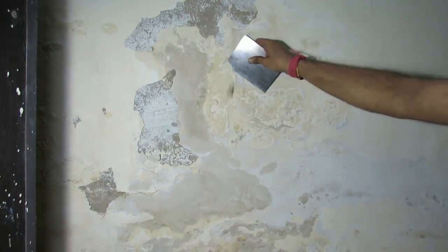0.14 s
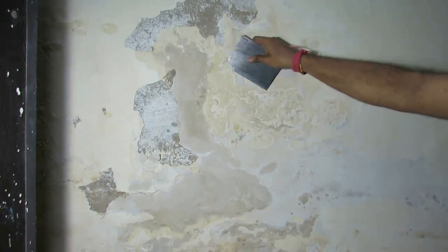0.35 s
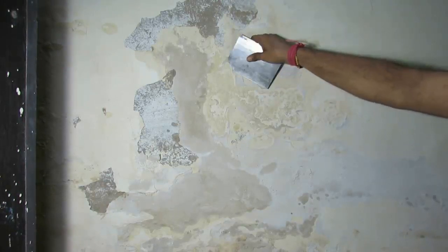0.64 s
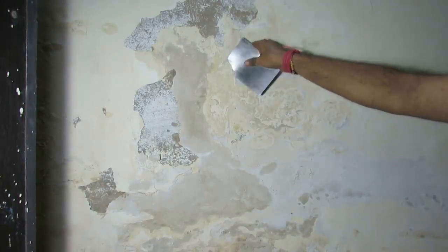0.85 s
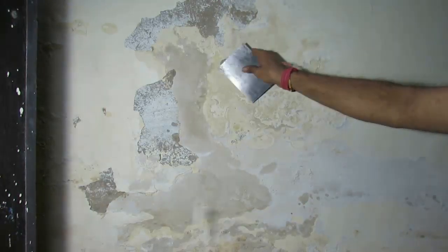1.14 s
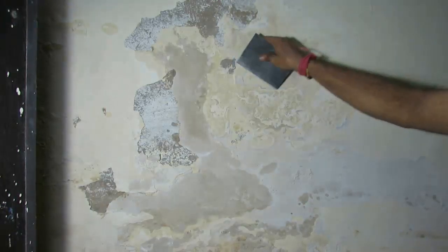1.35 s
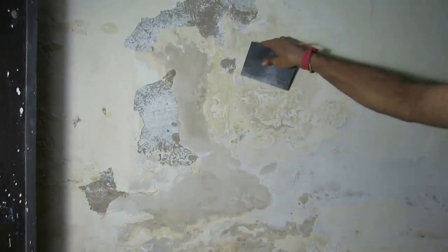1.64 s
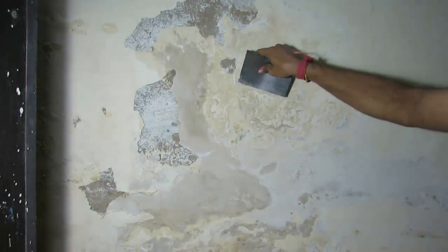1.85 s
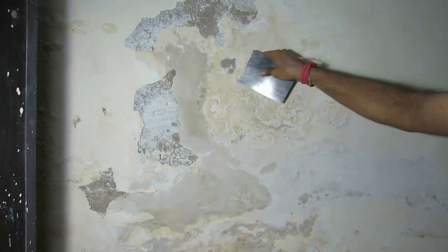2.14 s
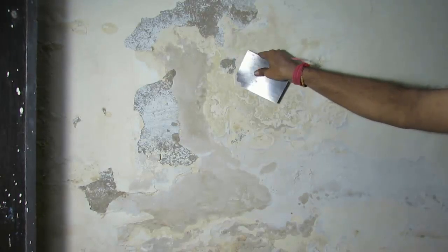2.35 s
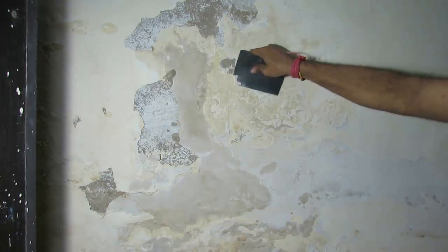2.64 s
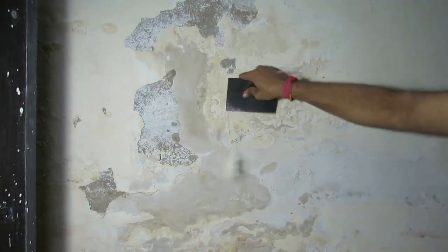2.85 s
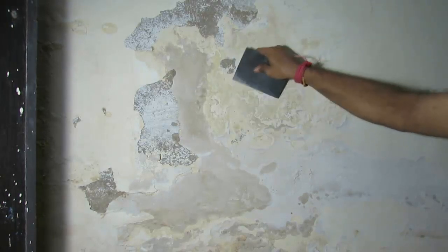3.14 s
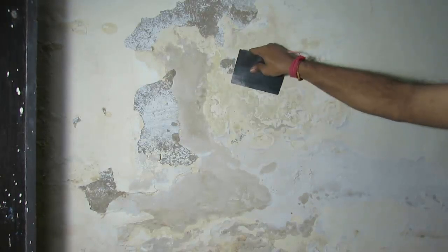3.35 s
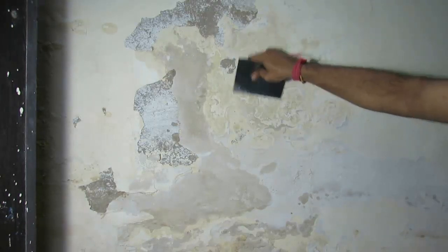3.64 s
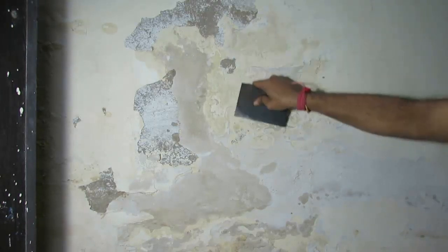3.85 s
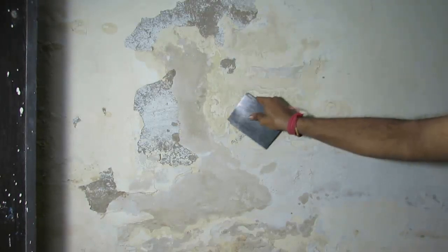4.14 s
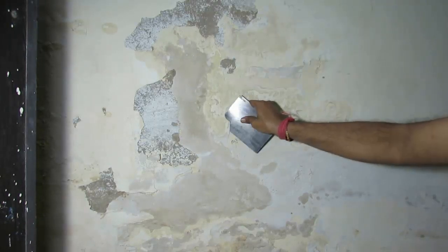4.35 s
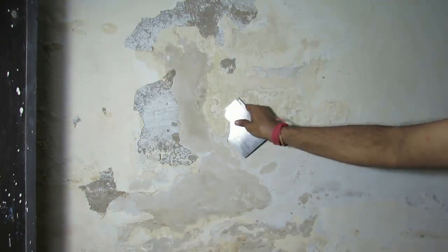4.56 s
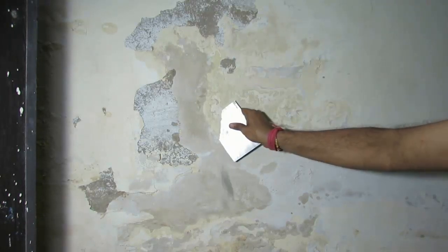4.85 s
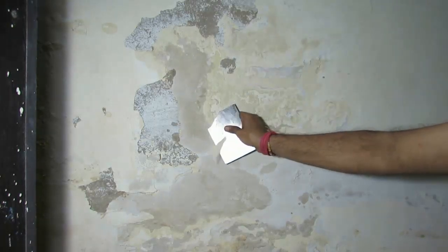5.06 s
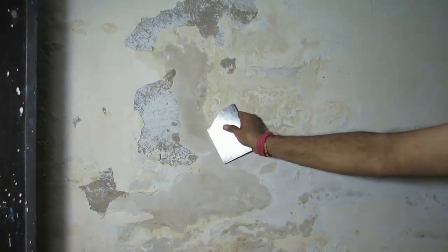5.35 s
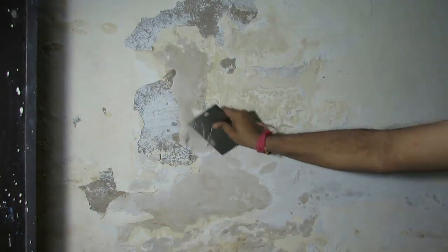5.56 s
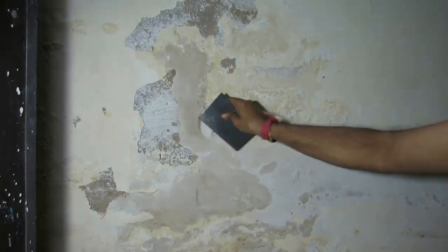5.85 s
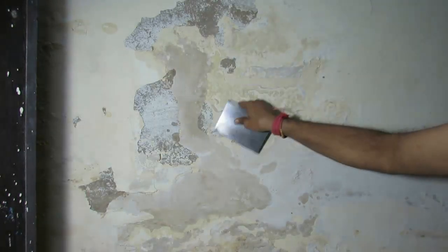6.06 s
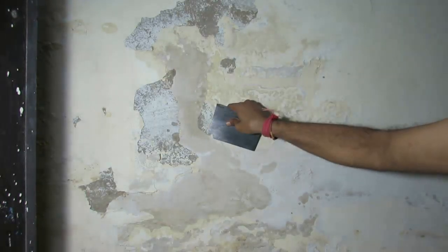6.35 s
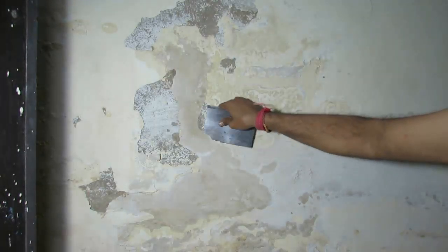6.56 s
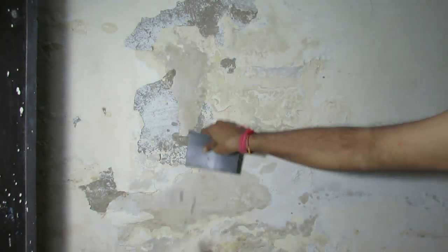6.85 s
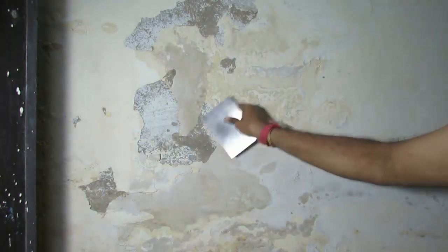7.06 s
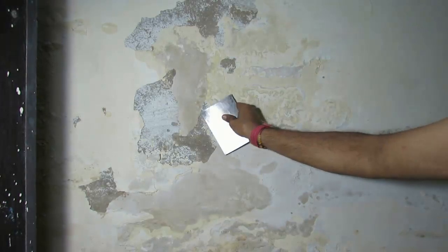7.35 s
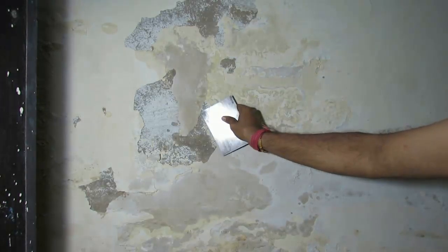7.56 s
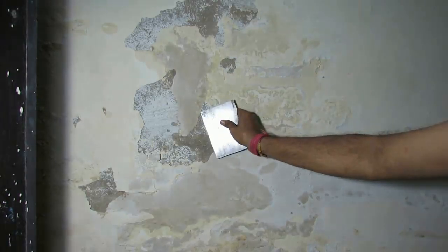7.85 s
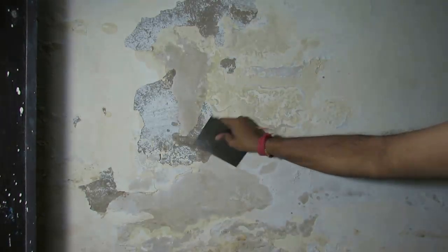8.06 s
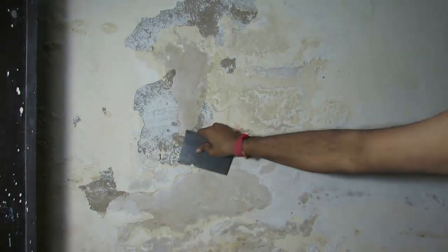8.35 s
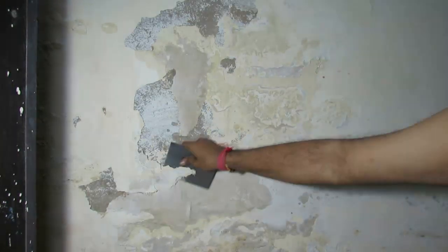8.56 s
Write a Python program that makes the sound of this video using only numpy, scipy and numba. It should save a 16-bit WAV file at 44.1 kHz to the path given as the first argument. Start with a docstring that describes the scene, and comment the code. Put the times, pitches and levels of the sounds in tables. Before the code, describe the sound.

A hand-held sheet of steel scrapes flaking plaster off a hard wall, heard very close in stereo in a small bare room with a short bright reverberation and faint airy hum. From 0 to 1.1 s sharp snaps follow quickly, with tiny squeaks and a strong crack with a dull knock at 1.1. After a brief gap, gritty rasps and snaps run from 1.4 to 3.1 s, loud near 2.05, 2.55 and 2.86; a soft low rumble swells around 3.15. A hard, squeaky crack hits at 3.45, then lighter scraping. From 4.3 to 6.6 s it is busiest: crackling breaks, crumbs, rasping skids and knocks around 4.4, 4.87 and 5.44. A heavy crack and thud lands at 6.8. Then sparse, weak scrapes and ticks until about 8 s, before a lower, coarser rasp grows from 8.2 to the end, with a final snap at 8.7.

```python
"""A small bare room with a faint hum, where a hand-held steel sheet scrapes loose plaster off a wall.
Its edge chatters over sand grains and rings the blade; it knocks on ridges and snaps flakes off.
Scrapes, cracks and thuds are bursts of tiny random breaks sent through resonances; squeaks are rough tones.
A close stereo recorder ducks and clips on the sharpest cracks."""
import sys
import numpy as np
from scipy import signal
from scipy.fft import rfft, irfft
from scipy.io import wavfile
from numba import njit

SR = 44100
rng = np.random.default_rng(int(sys.argv[2]) if len(sys.argv) > 2 else 0)


def generate_wav(sig):
    """Save sig (samples, or channels by samples) to the path in sys.argv[1] as 16-bit PCM at SR."""
    pcm = np.round(np.clip(np.atleast_2d(sig).T, -1, 1) * 32767).astype(np.int16)
    wavfile.write(sys.argv[1], SR, pcm)


N = 384552  # length in samples

# spectrum of the hand-damped blade: (multiple of its main resonance, level/dB)
BLADE_SPECTRUM = [(.1, -35.5), (0.251, -14), (.42, -12), (.66, -1), (.84, 2.5), (1, 4), (1.142, -0.5),
                  (1.35, 1.5), (1.7, 1), (2.3, -4), (4, -11), (8, -36)]
# spectrum of the wall behind the plaster: (f/Hz, level/dB)
WALL_SPECTRUM = [(60, -27), (200, -16), (420, -9.5), (620, -0.5), (950, 0.5), (1300, -6.5), (2000, -22),
                 (5000, -47)]
TOP_HZ = 15800  # the recorder keeps almost nothing above this pitch


def undb(db):
    """Turn decibels into gain."""
    return 10 ** (np.asarray(db) / 20)


def unit(x):
    """Scale a sound to an average strength (rms) of 1."""
    return x / np.sqrt(np.mean(x ** 2) + 1e-18)


def curve(rows):
    """Join (t/s, value) rows by straight lines."""
    return np.interp(np.arange(N) / SR, *np.transpose(rows))


def walk(n, rate):
    """Smooth random wander, with `rate` new random values a second joined by lines."""
    place = np.arange(n) * rate / SR
    count = int(place[-1]) + 2
    return np.interp(place, np.arange(count), rng.standard_normal(count))


def response(points, scale=1, size=512):
    """The click a body answers with, from its (f/Hz, level/dB) spectrum moved in pitch by `scale`."""
    hz, db = np.transpose(points)
    bins = np.maximum(np.arange(size // 2 + 1) * SR / size, 1)
    level_db = np.interp(np.log(bins), np.log(np.sort(hz) * scale), db)
    # folding the cepstrum makes the answer start at once, with no sound before the blow
    cepstrum = irfft(np.log(undb(level_db)))
    cepstrum[1:size // 2] *= 2
    cepstrum[size // 2 + 1:] = 0
    return unit(irfft(np.exp(rfft(cepstrum)))) / np.sqrt(size)


def colour(x, points, scale=1, size=512):
    """Pass a sound through a body with the given spectrum."""
    return signal.fftconvolve(x, response(points, scale, size))[:len(x)]


def resonate(x, hz, width):
    """Pass a sound through one resonance, `width` Hz wide, with gain 1 at its centre."""
    return signal.lfilter(*signal.iirpeak(min(hz, .45 * SR), hz / width, fs=SR), x)


def add(track, sound, s):
    """Mix a sound into a track at time s, leaving out what falls outside."""
    start = round(s * SR)
    lo, hi = max(start, 0), min(start + len(sound), N)
    if hi > lo:
        track[lo:hi] += sound[lo - start:hi - start]


def scraper(lead_s=.007):
    """Pushes with their chips, cracks with their skids, squeaks and knocks; all of it rings the steel sheet."""
    # pushes of the blade: (hardest push t/s, length/s, blade resonance f/Hz, blade level/dB, grit level/dB)
    pushes = [(.005, 0.078, 1920, -19, -28.5), (0.683, .13, 1820, -10, -13),
              (1.382, 0.077, 2180, -20.5, -23), (1.486, 0.15, 2660, -13, -15.5),
              (1.576, 0.065, 2830, -12.5, -12.5), (1.947, 0.057, 2100, -24, -31.5),
              (2.175, 0.16, 1890, -26, -27.5), (2.324, 0.068, 1940, -16, -22),
              (2.448, 0.2, 1980, -25.5, -28.5), (2.498, 0.036, 2340, -11.5, -15),
              (2.67, 0.047, 1880, -18.5, -19.5), (2.786, 0.19, 1910, -13.5, -17),
              (2.844, 0.057, 2080, -12.5, -24), (3.107, 0.27, 2310, -55, -30.5),
              (3.494, .125, 2200, -8.5, -15), (3.879, 0.12, 1800, -25.5, -35.5),
              (4.035, 0.23, 1930, -23.5, -25.5), (4.277, 0.33, 1800, -20.5, -25.5),
              (4.472, 0.19, 1662, -20.5, -24), (4.634, .057, 1740, -23.5, -26.5),
              (4.772, 0.18, 2020, -37.5, -37.5), (4.966, 0.07, 1900, -25.5, -27.5),
              (5.382, .11, 2540, -19.5, -41), (5.444, 0.074, 1920, -16.5, -20),
              (5.588, 0.076, 1250, -31.5, -26.5), (5.682, 0.11, 1660, -22.5, -19),
              (5.789, 0.15, 2070, -35, -28), (5.95, 0.12, 1900, -15.5, -24.5),
              (6.229, 0.04, 2010, -18, -25), (6.391, 0.22, 1980, -24, -24),
              (6.478, 0.082, 1900, -11.5, -23), (7.026, .12, 1760, -33, -29.5),
              (7.142, 0.15, 2500, -57, -30), (7.587, 0.038, 2160, -32.5, -54),
              (7.773, 0.037, 1840, -22, -35), (8.218, 0.27, 1826, -16.5, -24),
              (8.341, 0.33, 1757, -22.5, -26.5), (8.495, 0.097, 1490, -13.5, -22),
              (8.57, 0.19, 1605, -10, -14.5)]
    # the edge catches, plaster snaps and the freed edge skids on: (t/s, blade level/dB, flake level/dB,
    # flake resonance f/Hz, skid level against the snap/dB, fading time of the fracture force/s)
    snaps = [(.129, -15.5, -12.5, 9300, -16.5, 0.0048), (.244, -16, 0.5, 10400, -27.5, 0.0022),
             (.361, -11.5, -26, 2300, -18.5, 0.0036), (.491, -20.5, -28, 2900, -13, 0.0027),
             (.589, -1.5, -8.5, 3250, -17, 0.0035), (.708, -10, -4, 3600, -20, 0.0026),
             (.759, -5, -9.5, 3070, -31, .003), (.799, -11, -15.5, 2980, -32, .0023),
             (.895, -11.5, -9, 2900, -18, 0.0038), (0.956, 1, -2, 8350, -23.5, .0023),
             (1.077, -43, -14, 11800, -33, 0.0024), (1.107, -14, 6.5, 4970, -30.5, 0.0021),
             (1.569, -3.5, -6, 3060, -18, 0.0014), (1.768, -9.5, -9, 5700, -15, 0.0045),
             (1.984, -8.5, -8.5, 6640, -5.5, 0.0074), (2.051, 1, 4.5, 6450, -21.5, 0.0021),
             (2.31, -21, -11.5, 10100, -25, 0.0011), (2.555, -3, 0, 7100, -14.5, .008),
             (2.765, -8.5, -7, 8200, -23, .0023), (2.858, -14, 4, 7100, -37, 0.0017),
             (2.902, -34, -1.5, 10470, -45, 0.0011), (2.994, -18, -13, 3040, -10.5, 0.0028),
             (3.128, -37, -17, 4960, -31, 0.0013), (3.439, 2, 3.5, 2860, -23, 0.0012),
             (3.762, -15, -40, 3135, -20, 0.0035), (4.018, -16, -8.5, 5550, -21, .0018),
             (4.291, -4, -10.5, 3190, -40, 0.0025), (4.417, 2, -5.5, 4060, -31, 0.0022),
             (4.517, 1, -3, 8550, -23.5, 0.0019), (4.838, -2.5, -4, 3470, -31, .0017),
             (4.867, -9, 4, 7090, -22, 0.0025), (5.061, -44, -25, 12000, -22, .0015),
             (5.118, -36, -25.5, 9600, -25, .0015), (5.179, -15, 5, 6900, -28, 0.004),
             (5.33, -2, -2, 3100, -14.5, .003), (5.441, -14, -4.5, 8400, -30, 0.0028),
             (5.606, -32, -19, 6500, -32, .0012), (5.691, -26, -5.5, 3710, -22, 0.0024),
             (5.722, -28, -3, 8350, -30, 0.0017), (5.784, -33, -9.5, 8500, -20, .0035),
             (5.841, -22, -2, 9400, -26, 0.0036), (6.007, -12, -1.5, 3500, -15, 0.012),
             (6.147, -28, -21.5, 2900, -31, 0.0022), (6.223, -19, -10, 10000, -26, 0.0022),
             (6.236, -4.5, -1.5, 4020, -16.5, 0.0029), (6.315, -25, -1, 7000, -18, 0.0035),
             (6.365, -12, -16, 3260, -33, 0.0019), (6.448, -11.5, -6.5, 3000, -22, 0.0039),
             (6.589, -10, -14, 4700, -6.5, 0.014), (6.799, -8.5, 2.5, 3400, -23.5, 0.0044),
             (7.08, -23, -13, 5800, -16, 0.0016), (7.193, -48, -21.5, 8350, -25, 0.0037),
             (7.459, -27, -22, 6270, -17.5, 0.0024), (7.922, -16.5, -21.5, 3940, -14, 0.013),
             (8.468, -12.5, -32, 3226, -4, 0.0048), (8.704, -17, -8.5, 7950, -23, 0.0034)]
    # the edge sticks and gives a brief squeak: (t of its peak/s, f/Hz, level/dB, fall time/s)
    sticks = [(0.562, 1750, -0.5, .0018), (.689, 1750, -3, 0.0029), (1.108, 5080, -6, 0.0039),
              (1.382, 2450, -14, 0.0092), (1.484, 3800, -12, .009), (2.003, 2540, -12, 0.0066),
              (3.476, 2600, -3.5, 0.0066), (5.647, 1650, -16, 0.0029), (5.661, 1200, -17, 0.0022),
              (5.684, 3700, -15, 0.0027), (5.947, 1800, -9, 0.0068), (6.466, 1700, -4, 0.0019),
              (6.985, 1650, -21.5, .003), (8.194, 1800, -11, 0.0034)]
    # the blade knocks into the wall: (t/s, level/dB, pitch of the thud f/Hz)
    blows = [(1.106, -20, 395), (2.556, -20, 597), (2.857, -18, 600), (4.417, -15, 760), (4.838, -25, 705),
             (4.868, -11, 620), (5.439, -14, 701), (6.802, -8, 543)]
    # narrow rings of the steel sheet: (f/Hz, width/Hz, level/dB)
    steel_rings = [(658, 5.2, -13.5), (1035, 35, -2.5), (1385, 8.7, -11.5), (1509, 25, -8.5),
                   (4160, 15, -15.5), (6050, 31, -8)]
    rise_share = .48  # part of a push spent bearing down; it eases off for the rest
    # every skid has the same shape; its grit is a little weaker than the flake would give
    skid_rise_s, skid_fall_s, skid_hz, skid_grit_db = 0.02, 0.058, 2004, -1

    out = np.zeros(N)
    for s, length, hz, blade_db, grit_db in pushes:
        sound, build_up = stroke(rise_share * length, (1 - rise_share) * length, hz, blade_db, grit_db)
        add(out, sound, s - build_up)
        for chip, at in chips(lead_s, s - build_up, length, grit_db):
            add(out, chip, at)
    for s, blade_db, flake_db, flake_hz, skid_db, decay_s in snaps:
        add(out, crack(blade_db, flake_db, flake_hz, lead_s, decay_s), s - lead_s)
        skid_sand_db = flake_db + skid_db + skid_grit_db
        skid, _ = stroke(skid_rise_s, skid_fall_s, skid_hz, blade_db + skid_db, skid_sand_db)
        add(out, skid, s)
    for s, *slip in sticks:
        sound = squeak(*slip)
        add(out, sound, s - len(sound) / SR / 2)
    for s, *blow in blows:
        add(out, knock(*blow), s)
    return out + sum(undb(db) * resonate(out, hz, width) for hz, width, db in steel_rings)


def stroke(rise, fall, hz, blade_db, grit_db, swell=0.88, chatter_db=3, chatter_rate=300, patch_db=3,
           patch_rate=90, flat_hz=1560, wall_db=-7.5, crumb_db=-5.5, snag_db=-5.0, snag_spread=1.165,
           ring_db=1, ring_q=3.0):
    """One push: the edge sticks and slips over sand, snags on lumps, rings the blade, hisses and sheds crumbs."""
    # sand crushed under the edge: (f/Hz, level/dB)
    sand_spectrum = [(300, -43.5), (1200, -2), (2500, -17), (3800, -1), (5500, -0.5), (8000, -2),
                     (11000, -5), (15500, -15)]
    # a steeper blade rings higher and cuts finer sand: usual resonance in Hz, and exponent
    upright_hz, grit_track = 1890, 0.44

    knots = np.cumsum([0, rise, fall])
    t = np.arange(int(knots[-1] * SR)) / SR
    push = np.interp(t, knots, [0, 1, 0]) ** swell
    slips = unit(undb(chatter_db * walk(len(t), chatter_rate)))

    rasp = unit(colour(slips * grains(len(t), rate=5000, spread_db=3.0), BLADE_SPECTRUM, hz))
    rasp = unit(rasp + undb(ring_db) * resonate(rasp, hz, hz / ring_q))
    # each snag loads the edge at another spot, so the blade answers a little higher or lower
    snags = crumbs(len(t), hz / snag_spread, hz * snag_spread, rate=130, cycles=1.25, spread_db=6)
    blade = undb(blade_db) * unit(rasp + undb(snag_db) * snags)

    # loose sand lies in patches, so the hiss comes in fits
    patches = undb(patch_db * walk(len(t), patch_rate))
    fineness = (hz / upright_hz) ** grit_track
    sand = patches * slips * grains(len(t), rate=4000, spread_db=2.0)
    sand = unit(colour(sand, sand_spectrum, fineness))
    shed = crumbs(len(t), 2500 * fineness, 10500 * fineness)
    grit = undb(grit_db) * unit(sand + undb(crumb_db) * shed)

    # laid flatter, the blade sounds lower and drives the wall harder
    flatness = min((flat_hz / hz) ** 8, 1.4)
    wall = unit(colour(slips * grains(len(t), rate=3000, spread_db=3.5), WALL_SPECTRUM))
    wall = undb(blade_db + wall_db) * flatness * wall
    return push * (blade + grit + wall), rise


def chips(lead_s, start, length, grit_db):
    """Small chips fly off at random during a push, most of them around its middle."""
    chips_per_s, chip_db, spread_db = 16, 1.5, 3  # their usual level stands against the grit of the push
    middle_hz, octaves, blade_db = 6000, 0.77, -7  # pitch range each way, and how much they jog the blade
    for _ in range(rng.poisson(chips_per_s * length)):
        db = grit_db + chip_db + spread_db * rng.standard_normal()
        hz = middle_hz * 2 ** (octaves * (2 * rng.random() - 1))
        yield crack(db + blade_db, db, hz, lead_s), start + length * rng.beta(2, 2) - lead_s


def crack(blade_db, flake_db, flake_hz, lead_s, decay_s=0.0014, grow_s=0.0008, ring_db=3, ring_q=3.6,
          blade_hz=1850, wall_db=-19, after_db=-19, after_s=0.034, size=2048):
    """A fracture swells very briefly, runs for a few ms and fades: the flake rings high, blade and wall lower."""
    # a snapping flake: (f/Hz, level/dB)
    flake_spectrum = [(200, -20.5), (1200, -21.5), (2500, 8), (4500, 7), (8000, 9), (12000, 6), (16000, 1)]
    t = np.arange(size) / SR - lead_s
    force = np.exp(np.minimum(t / grow_s, -t / decay_s))
    flake = colour(fracture(force), flake_spectrum)
    flake = flake + undb(ring_db) * resonate(flake, flake_hz, flake_hz / ring_q)

    # a sudden catch sets the blade's main resonance ringing, at a slightly different pitch each time
    ring_hz = blade_hz * np.exp(.04 * rng.standard_normal())
    blade = colour(fracture(force), BLADE_SPECTRUM, ring_hz)
    blade = unit(blade + resonate(blade, ring_hz, 610))
    wall = undb(wall_db) * unit(colour(fracture(force), WALL_SPECTRUM))

    # splinters, pitched like the flake, keep breaking off just after the fracture
    splinters = crumbs(size, 0.59 * flake_hz, min(1.61 * flake_hz, TOP_HZ))
    splinters = undb(flake_db + after_db) * splinters * np.exp(-np.abs(t) / after_s) * (t > 0)
    strength = np.sqrt(np.mean(force ** 2))
    return strength * (undb(flake_db) * unit(flake) + undb(blade_db) * (blade + wall)) + splinters


def squeak(hz, db, fall_s, rise_share=0.41, wobble=0.038, wobble_rate=450, rough_db=3, size=3072):
    """The edge sticks and slips almost regularly for a few ms: a rough, unsteady tone that peaks at its middle."""
    t = (np.arange(size) - size / 2) / SR
    grip = np.exp(np.minimum(t / (rise_share * fall_s), -t / fall_s))
    phase = 2 * np.pi * np.cumsum(hz * (1 + wobble * walk(size, wobble_rate))) / SR
    return undb(db) * grip * unit(np.sin(phase) * undb(rough_db * walk(size, wobble_rate)))


def knock(db, hz, decay_s=0.0018, q=1.25, size=1024):
    """The blade digs in and the wall gives a short dull thud: tiny breaks through one broad resonance, twice."""
    force = np.exp(-np.arange(size) / SR / decay_s)
    thud = resonate(resonate(fracture(force), hz, hz / q), hz, hz / q)
    return undb(db) * np.sqrt(np.mean(force ** 2)) * unit(thud)


def fracture(force):
    """A burst of tiny breaks under a force, its spectrum partly evened out."""
    breaks = rfft(force * grains(len(force), rate=9000, spread_db=5))
    # dividing by the root of the strength softens the chance ripple that a few random grains leave
    return irfft(breaks / np.sqrt(np.abs(breaks) + 1e-18), len(force)) * force ** 0.091


def grains(n, rate, spread_db):
    """Tiny fractures at random moments, `rate` a second, a few much larger than the rest; rms 1."""
    struck = rng.random(n) < rate / SR
    size = undb(spread_db * np.minimum(rng.exponential(size=n), 4))
    return unit(struck * size * rng.choice([-1, 1], n))


def crumbs(n, lo_hz, hi_hz, rate=210, cycles=1.57, spread_db=7.5, size=400):
    """Small breaks at random moments, each a few cycles at its own pitch; rms 1."""
    out = np.zeros(n + size)
    t = np.arange(size) / SR
    for place, pitch, weight in rng.random((int(rate * n / SR) + 1, 3)):
        hz = lo_hz * (hi_hz / lo_hz) ** pitch
        age = t * hz / cycles
        chip = np.sqrt(hz) * np.sin(2 * np.pi * hz * t) * age * np.exp(-age)
        start = int(place * n)
        out[start:start + size] += chip * undb(-spread_db * np.log(weight + 0.058))
    return unit(out[:n])


def room(x, count=24, right_treble_db=-14):
    """The hand travels, so the paths through the room keep changing; the right side has a little more treble."""
    out, hop = np.zeros((2, N)), N // count + 1
    padded = np.pad(x, (hop, 2 * hop))
    # overlapping pieces fade into each other, each with its own paths
    for k in range(count + 1):
        part = padded[k * hop:(k + 2) * hop] * np.hanning(2 * hop)
        for track, path in zip(out, paths()):
            add(track, signal.fftconvolve(part, path), (k - 1) * hop / SR)
    return out + np.array([[-1], [1]]) * undb(right_treble_db) * np.diff(out, prepend=0) / 2


def paths(direct_db=-3, wet_db=-4.5, apart_hz=3200, build_s=0.0028, scatter_db=-4, size=12):
    """From a spot on the wall to both microphones: direct sound, two reflections, a short tail wider in treble."""
    # reverberation: (band centre f/Hz, time to fade by 60 dB/s, level/dB)
    tail_bands = [(300, 0.033, -1), (800, 0.28, -3), (1830, 0.35, -3.5), (4100, 0.3, -0.5),
                  (8000, 0.32, -2), (14000, 0.27, -3.5)]
    # first reflections: (usual delay/s, left gain, right gain)
    reflections = [(.0042, 0.64, 0.032), (0.0123, 0.042, 0.13)]
    t = np.arange(SR // 2) / SR
    centres = np.array(tail_bands)[:, 0]
    bins = np.maximum(np.fft.rfftfreq(len(t), 1 / SR), 1)
    sides = np.array([[1], [-1]])

    mid, side = rfft(rng.standard_normal((2, len(t))))
    width = np.clip(bins / apart_hz, 0, 1) ** .5
    field = (mid + sides * width * side) / np.sqrt(1 + width ** 2)
    out = 0
    for share, (_, t60, db) in zip(np.eye(len(tail_bands)), tail_bands):
        fade = np.exp(-np.log(1000) * t / t60) * (1 - np.exp(-t / build_s))
        band = irfft(field * np.interp(np.log(bins), np.log(centres), share), len(t))
        out = out + undb(db + wet_db) * band * fade / np.linalg.norm(fade)

    out[:, 0] += undb(direct_db)
    # the recorder's body scatters the treble differently into each microphone
    scatter = unit(np.diff(rng.standard_normal(size), prepend=0, append=0)) / np.sqrt(size)
    out[:, :size + 1] += undb(direct_db + scatter_db) * sides * scatter
    for delay, left, right in reflections:
        place = int(delay * rng.uniform(.85, 1.15) * SR)
        out[:, place] += undb(direct_db) * np.array([left, right])
    return out


def background(air_db=2.5, side_db=-1.0, hum_db=-1.0, waver_db=1.5, lean_db=1.6):
    """Air (noise) and a wavering hum (sines) under the recorder's slow gain, and one low swell; left leads."""
    # spectrum of the room air: (f/Hz, level/dB)
    air_spectrum = [(20, -23), (35, -11.5), (50, -5), (83, -4), (142, -8), (264, -10.5), (490, -13),
                    (750, -17.5), (1240, -19.5), (3350, -28), (8000, -39), (15000, -43)]
    # tones of the hum: (f/Hz, level before the overall trim/dB)
    hum_tones = [(48.4, -57), (71, -53), (145.3, -53), (186, -56.5), (199.2, -54), (241, -56.5),
                 (274.5, -51.5), (467.5, -49), (511.4, -53.5)]
    # the recorder's gain on air and hum, which sinks after loud cracks and recovers slowly:
    # (t/s, level of the air before the overall trim/dB)
    slow_gain = [(0.0, -37), (0.39, -38), (0.95, -37.5), (1.07, -40), (2.67, -39), (2.86, -42), (4.44, -39),
                 (5.08, -43.5), (6.68, -41.5), (6.9, -49.5), (7.26, -45.5), (8.72, -36)]
    # a low rumble swells once: peak time and level, then its slopes
    peak_s, peak_db, rise_db_per_s, fall_db_per_s = 3.15, -34.5, 176, 12

    t = np.arange(N) / SR
    gain_db = curve(slow_gain)
    swell_db = peak_db + np.minimum(rise_db_per_s * (t - peak_s), fall_db_per_s * (peak_s - t))

    def layer():
        """One draw of air, flickering in level, and of rumble around 80 Hz."""
        air = unit(colour(rng.standard_normal(N), air_spectrum, size=8192))
        air = air * undb(gain_db + air_db + 3.1 * walk(N, 12))
        rumble = unit(resonate(resonate(rng.standard_normal(N), 80, 70), 80, 70))
        return air + rumble * undb(swell_db)

    hum = 0
    for hz, db in hum_tones:
        strength = undb(db + hum_db + waver_db * walk(N, 2.95)) * np.sqrt(2)
        hum = hum + strength * np.sin(2 * np.pi * hz * t + walk(N, 4))
    hum = hum * undb(gain_db - gain_db.mean())
    sides = np.array([[1], [-1]])
    # a second draw, opposite in the two ears, makes the noise wide
    return (layer() + sides * undb(side_db) * layer() + hum) * undb(sides * lean_db / 2)


def scene():
    """The scraper in its room, turned up slightly on the right, over the air, hum and rumble."""
    lean_db = -0.5  # left minus right
    return room(scraper()) * undb(np.array([[1], [-1]]) * lean_db / 2) + background()


@njit
def follow(x, attack, release):
    """Loudness follower that rises fast and sinks slowly."""
    out, e = np.empty(len(x)), 0.
    for i in range(len(x)):
        e += (x[i] - e) * (attack if x[i] > e else release)
        out[i] = e
    return out


def record(dry, ceiling=0.94, attack_s=0.0023, release_s=0.024):
    """A quick limiter ducks on the loudest cracks, what gets past it clips, and the very top is filtered off."""
    envelope = follow(np.abs(dry).max(axis=0), 1 / (attack_s * SR), 1 / (release_s * SR))
    limited = np.clip(dry / np.maximum(envelope / ceiling, 1), -1, 1)
    return signal.sosfilt(signal.ellip(8, .2, 70, TOP_HZ, fs=SR, output="sos"), limited)


dry = scene()
out = record(dry)
generate_wav(out)
```